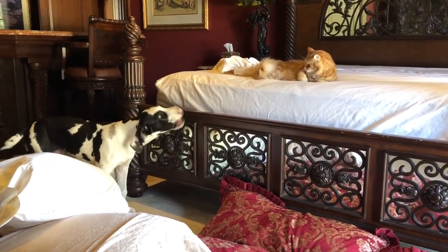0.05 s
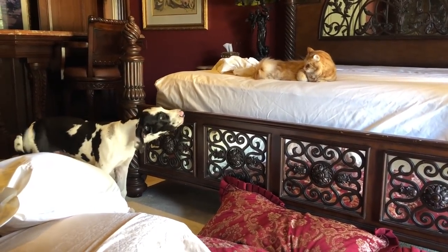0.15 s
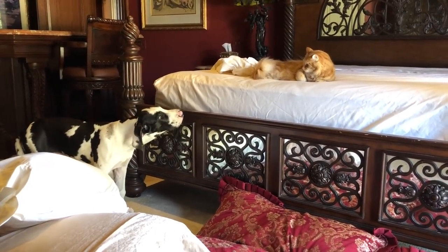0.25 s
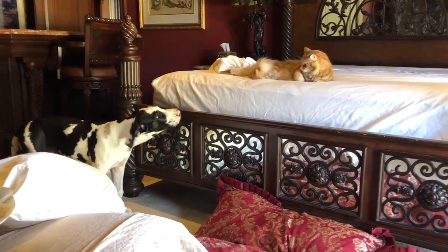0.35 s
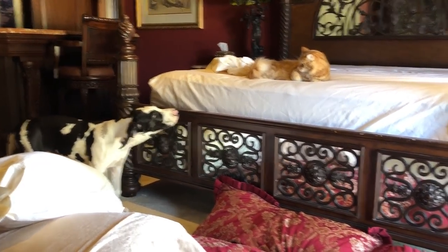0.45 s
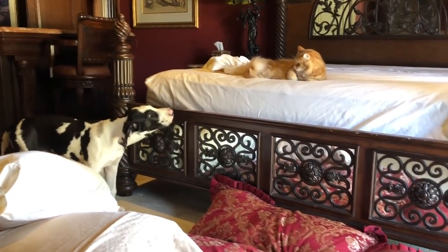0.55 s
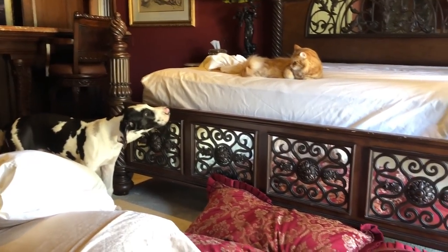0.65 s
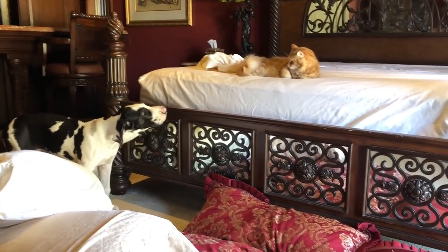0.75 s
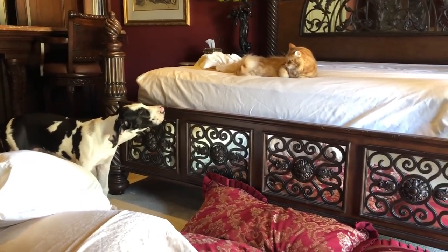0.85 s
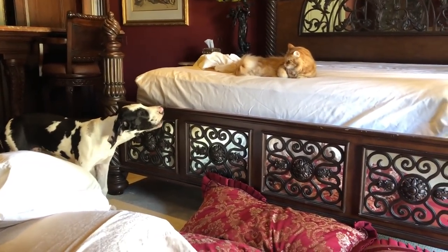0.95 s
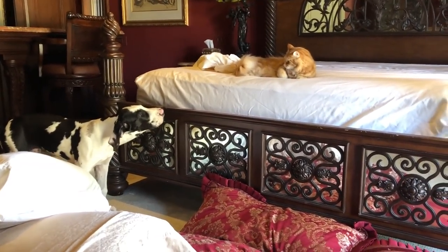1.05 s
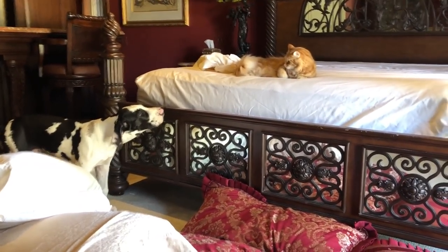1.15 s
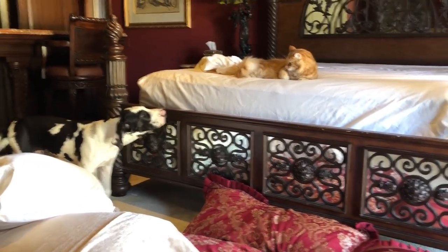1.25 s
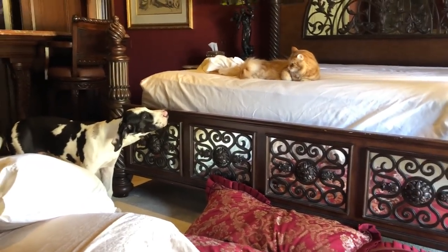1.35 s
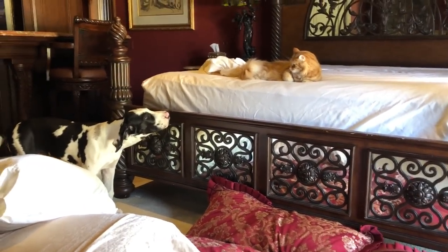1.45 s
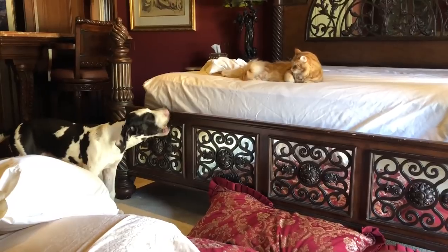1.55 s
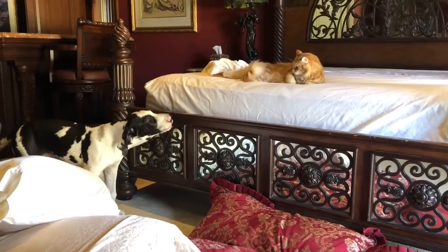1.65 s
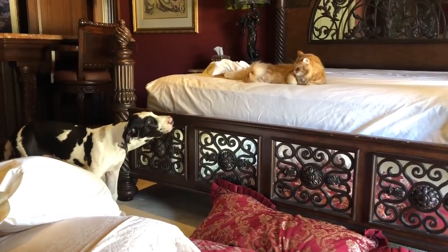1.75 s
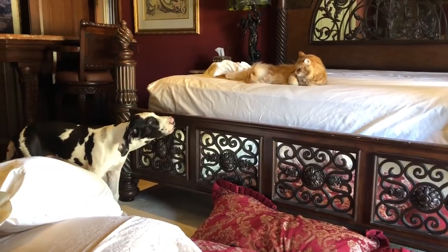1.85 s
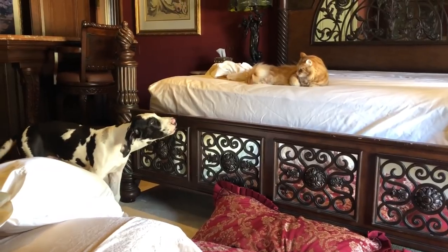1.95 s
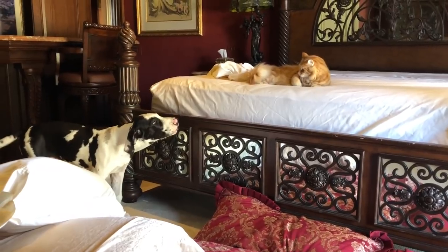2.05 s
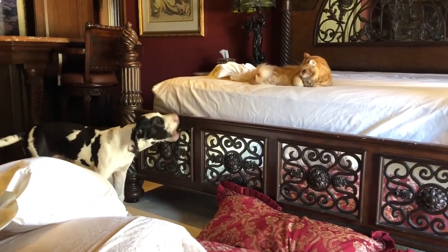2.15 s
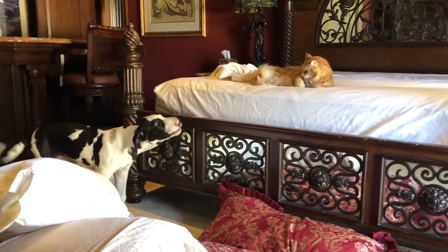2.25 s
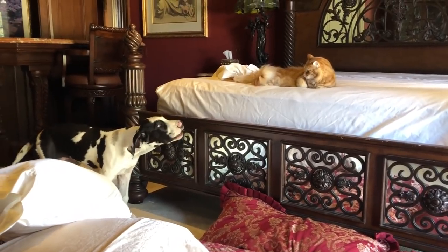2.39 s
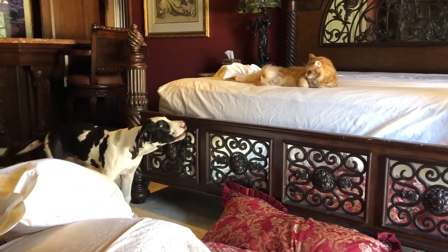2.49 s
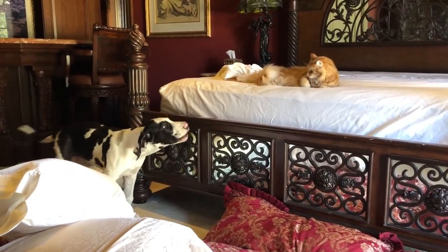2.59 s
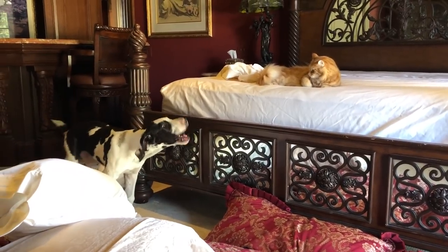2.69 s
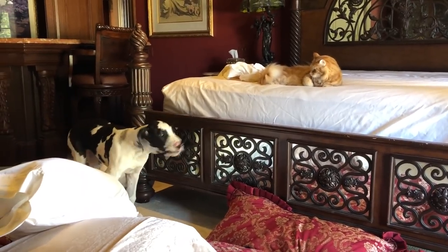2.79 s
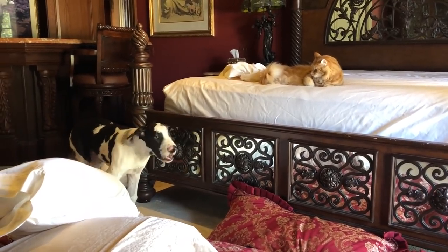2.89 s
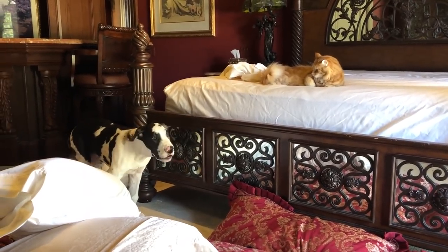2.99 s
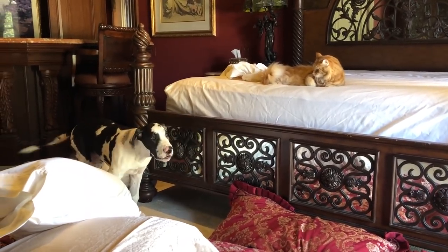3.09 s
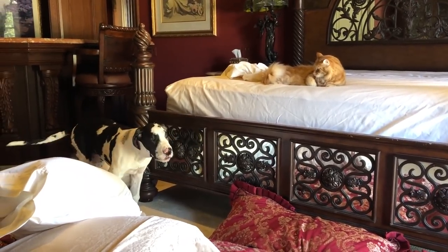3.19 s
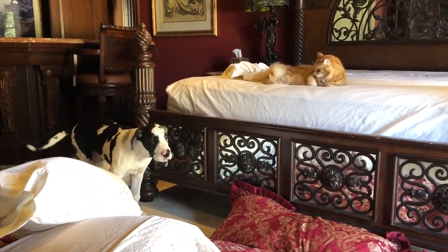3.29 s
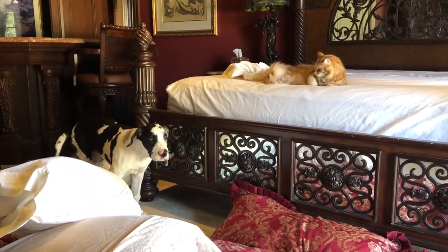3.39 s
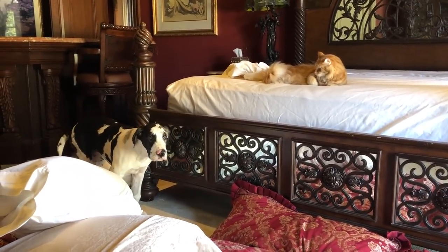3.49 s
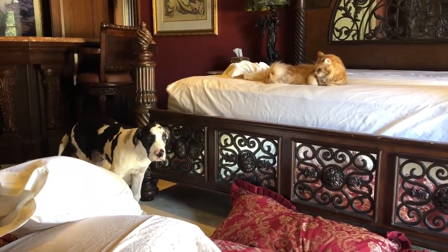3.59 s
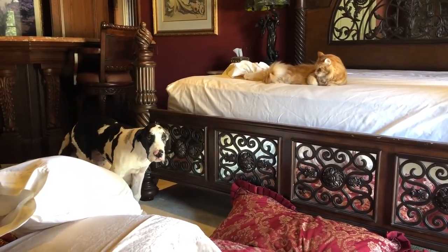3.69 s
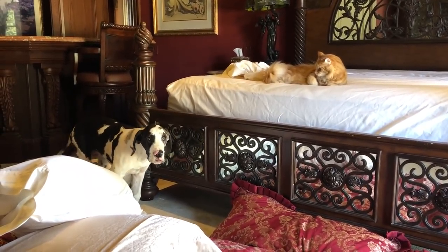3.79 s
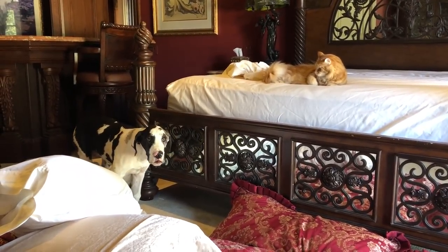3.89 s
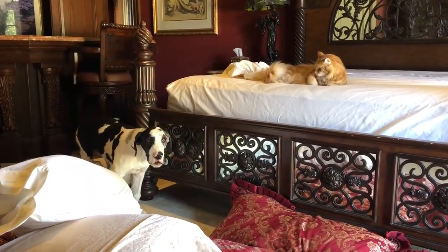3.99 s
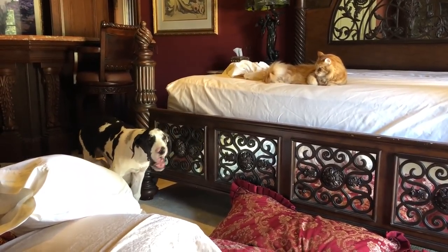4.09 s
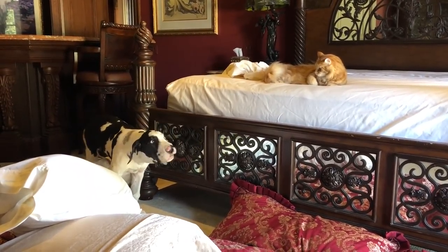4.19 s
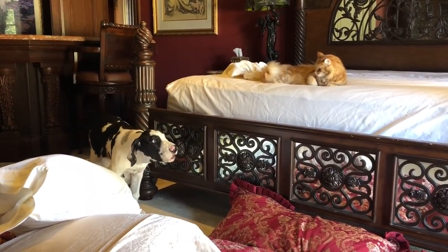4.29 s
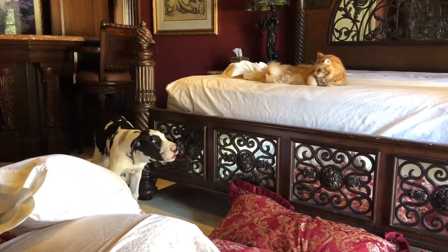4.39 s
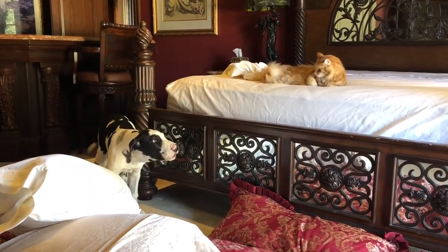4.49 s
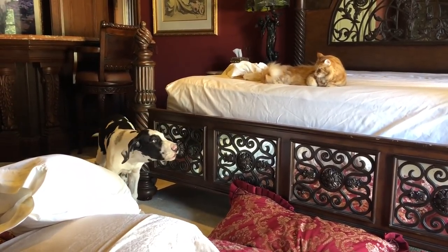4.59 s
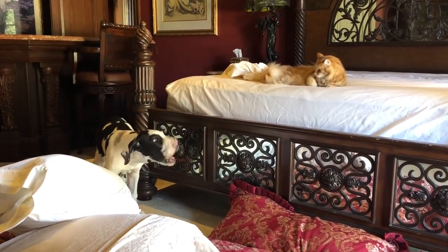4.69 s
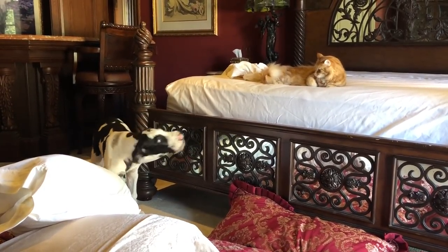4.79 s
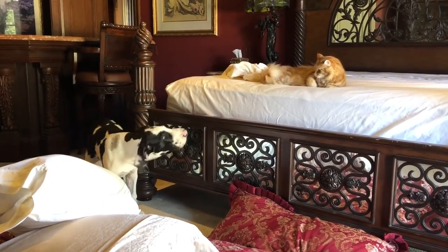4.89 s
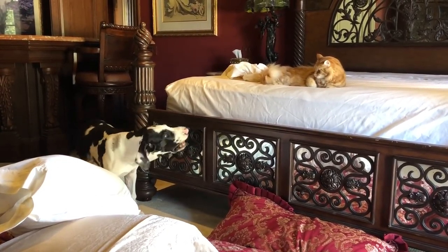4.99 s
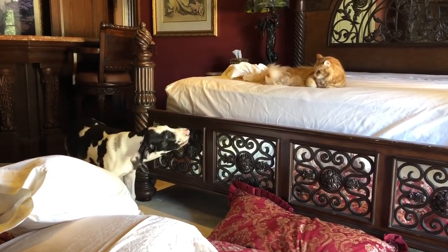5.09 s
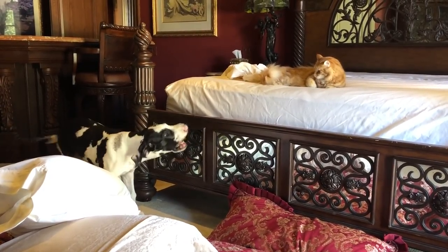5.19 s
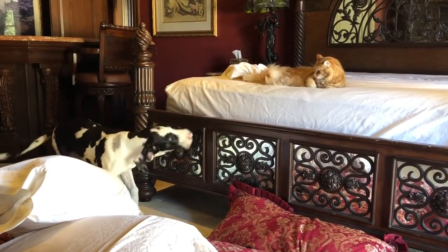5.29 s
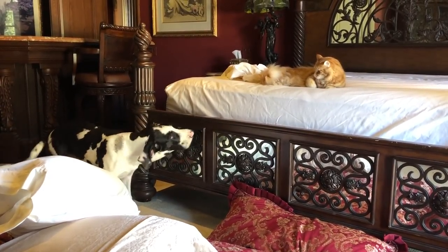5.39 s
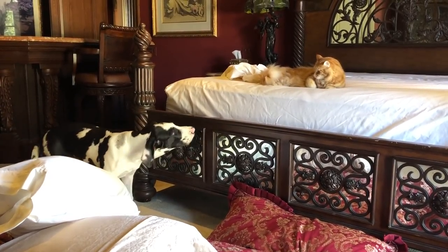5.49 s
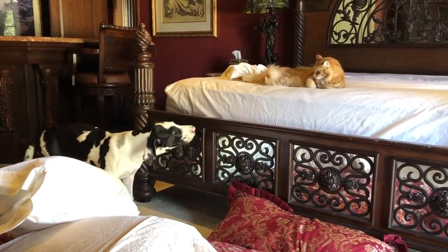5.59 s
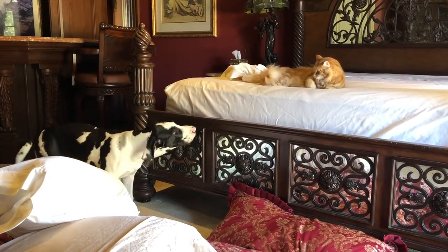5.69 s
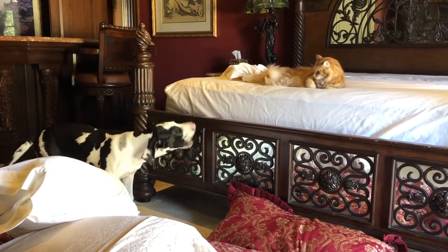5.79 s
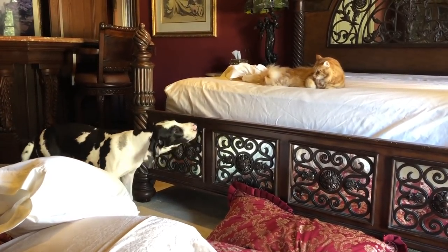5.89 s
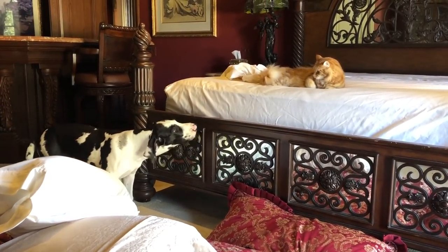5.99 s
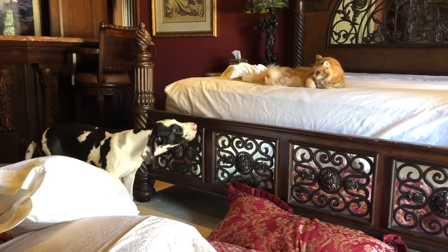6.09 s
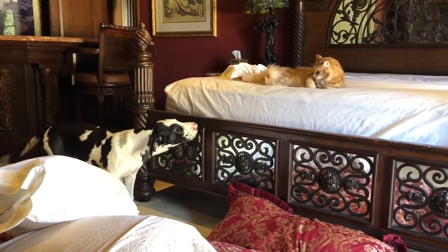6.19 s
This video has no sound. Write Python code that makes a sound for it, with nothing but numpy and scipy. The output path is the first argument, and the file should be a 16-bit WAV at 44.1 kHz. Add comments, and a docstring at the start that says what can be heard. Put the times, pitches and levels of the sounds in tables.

```python
"""Young dog barking in a bedroom

A young large dog barks at a cat on a bed, a few metres away in a reverberant bedroom.
Each bark starts as a clean high squeal, breaks into a rough lower growl and sags in pitch.
Between barks it yelps and whimpers, built from harmonics and raspy air like the barks, and
whines in a thin nasal whistle of four sine tones and hiss. Under it all lie a quiet hush and a
fading earlier bark. A microphone overload and a limiter flatten the peaks."""
import sys
import numpy as np
from scipy import signal
from scipy.fft import rfft, irfft, next_fast_len
from scipy.io import wavfile
from scipy.ndimage import uniform_filter1d, minimum_filter1d, map_coordinates

SR = 44100
rng = np.random.default_rng(int(sys.argv[2]) if len(sys.argv) > 2 else 0)


def master_out(mix):
    """Clip the mix to full scale and print it as 16-bit PCM to the path in sys.argv[1]."""
    frames = np.transpose(np.atleast_2d(mix))
    ceiling = np.clip(frames, -1, 1)
    pcm = np.round(ceiling * 32767).astype(np.int16)
    wavfile.write(sys.argv[1], SR, pcm)


N = 275625  # length in samples

# The barks. Each row: start in seconds, voice break in seconds, end in seconds, squeal's first pitch
# in Hz, squeal's last pitch in Hz, growl's top pitch in Hz, squeal level in dB, growl level in dB,
# growl roughness (0-1), mouth resonance in the squeal in Hz, mouth resonance in the growl in Hz,
# squeal's swell in dB, growl's fade in dB, share of the growl after which the jaw starts closing,
# slope of the squeal's overtones in dB per octave, pitch sag as a share of the top pitch.
BARK_CALLS = [ (0.047, 0.081, .178, 740, 790, 635.6, -9.5, -7, 0.44, 1595, 1270, 16, 5, .38, -3, .28),
              (1.602, 1.645, 1.742, 930, 1039, 716.4, -4.5, -5.5, .48, 1280, 1350, 14, 10, 0.49, -1.5, .37),
              (2.178, 2.231, 2.347, 667.4, 834.4, 659.8, -6, -6, 0.43, 2018, 1167, 29.5, 11, .42, -1.5, .16),
              (2.683, 2.720, 2.826, 705, 784.3, 630, -10.5, -7, 0.53, 1944, 1082, 14.5, 8.5, .28, -1.5, .15),
              (4.722, 4.778, 4.878, 775, 920, 699.8, -4.5, -3.5, 0.37, 2250, 1380, 24.5, 18, .62, -0.5, .28),
              (5.221, 5.266, 5.354, 574, 685.4, 657.4, -2, -6, .25, 1000, 1300, 22, 6.5, .8, -2.5, .27),
              (5.829, 5.872, 5.962, 754.5, 800.4, 639.8, -6.5, -7.5, .5, 1665, 1380, 21.5, 7.5, 0.48, -1, 0.27)]
# The yelps. Each row: start in seconds, loudest moment in seconds, start of the fall in seconds,
# end in seconds, first pitch in Hz, top pitch in Hz, held pitch in Hz, last pitch in Hz,
# peak level in dB, swell in dB, open mouth resonance in Hz, roughness after the crack (0-1).
YELP_CALLS = [(0.891, 1.023, 1.074, 1.126, 797.5, 938.8, 850.7, 610, -15.5, 27, 1680, .24),
              (4.061, 4.171, 4.190, 4.236, 880, 1019, 974.3, 520, -8, 16, 1869, .13)]
# The nasal whistles. Each row: start in seconds, end in seconds, first pitch in Hz, middle pitch
# in Hz, last pitch in Hz, level in dB, octave overtone in dB next to the main tone.
WHINE_CALLS = [ (0.617, .86, 3335, 3102, 3083, -58.5, 6.5), (0.849, 0.924, 3100, 3300, 3650, -51, -0.5),
               (1.285, 1.331, 3240, 3092, 2740, -41.5, -8.5), (2.166, 2.215, 3900, 3916, 4130, -51.5, -10),
               (3.283, 3.46, 3400, 3203, 3134, -60.5, -1), (3.483, 3.82, 3090, 3225, 3097, -63.5, -2),
               (4.035, 4.087, 3237, 3810, 4000, -39.5, -14.5), (4.299, 4.367, 2690, 2914, 3920, -38, -9.5),
               (4.702, 4.745, 3600, 3900, 4225, -42, -10)]
# The wavering whimper that trails the first yelp. Each row: time in seconds, pitch in Hz, level in dB.
WHIMPER_PATH = [(1.108, 660, -28), (1.170, 583, -32), (1.240, 623, -38), (1.319, 665, -36),
                (1.358, 598.5, -39.5)]
# The throat's fixed colour on the harmonics. Each row: frequency in Hz, relative level in dB.
THROAT_COLOUR = [(400, -9), (550, -2), (800, -5), (1150, 0), (1900, -2), (2500, -6), (3020, -14),
                 (3350, -29), (3850, -16), (5500, -25), (8000, -26), (11000, -37), (16000, -40)]
# The colour of the air that rasps through the throat. Each row: frequency in Hz, relative level in dB.
RASP_COLOUR = [(360, -42.5), (480, -15), (620, -4.5), (820, -18.5), (1200, 8), (1750, 9.5), (2450, -20.5),
               (2850, -22.5), (3300, -10), (3900, -15), (5500, -19.5), (8000, -28), (11500, -38),
               (16000, -32.5)]
# How long the room rings. Each row: frequency in Hz, time to die away by 60 dB in seconds.
ROOM_RING = [(200, 0.17), (600, 0.55), (1200, 0.6), (2500, 0.57), (5500, 0.48), (8500, .42), (11000, 0.35),
             (16000, 0.22)]
# The colour of the room's ringing. Each row: frequency in Hz, relative level in dB.
ROOM_TINT = [(300, 4.5), (600, -6.5), (850, 4), (1200, -1), (2500, -3), (6000, 3), (14000, -1.5)]
# The colour of the still room's hush. Each row: frequency in Hz, relative level in dB.
HUSH_COLOUR = [(25, -17), (64, -6), (146, -9), (300, -14.5), (600, -14.5), (1600, -19.5), (4000, -27.5),
               (8000, -34.5), (15000, -45.5)]
# The colour of the earlier bark's ringing. Each row: frequency in Hz, relative level in dB.
EARLIER_BARK_COLOUR = [(300, -23.5), (520, -14), (800, -18.5), (1100, 3), (2200, -28.5), (5000, -53.5)]
# The colour of the whistles' nostril hiss. Each row: frequency in Hz, relative level in dB.
NOSTRIL_COLOUR = [(1500, -35.0), (3000, 1.5), (4800, 8.5), (7500, -2.0), (12000, -2.0), (15000, -25.5)]

TOP_HZ = 15750  # nothing is kept above this
ATTACK_S, RELEASE_S = 0.0046, 0.011  # soft start and stop of a call (yelps start more slowly)

# Squeal: nearly clean, and it swells fastest at first
SQUEAL_ROUGH, SWELL_BEND = .13, 1.18
# Growl pitch: where it crests (share of length), how much lower it is at the break (share), sag curve
CREST_AT, SCOOP, SAG_BEND = .3, .13, 1.25  # a bend above 1 sags ever faster
# Growl roughness from start to end, times the bark's own roughness
ROUGH_FROM, ROUGH_TO = .6, 1.415
# Voice break: overlap of squeal and growl, the growl's extra burst and how fast the burst decays
OVERLAP_S, BREAK_DB, BREAK_FADE_S = .012, 5, 0.0076
SPENT_BEND = 2.3  # the growl fades ever faster as the air runs out
# The jaw closes over this share of the growl, down to this resonance
CLOSE_OVER, CLOSED_HZ = 0.41, 717
# Strength of the growl's mouth resonance at the break, and what it loses by the end
MOUTH_PEAK_DB, MOUTH_SLACK_DB = 22.5, 6.5

# Yelp: slow nearly clean start, mouth resonance at its start and its end
YELP_ATTACK_S, YELP_ROUGH, YELP_MOUTH_HZ, YELP_CLOSED_HZ = 0.03, .045, 1350, 648
CRACK_S = .005  # time the pitch takes to crack
# Level lost after the peak, and where the pitch tops (share of the rise)
YELP_FADE_DB, YELP_CREST_AT = 17.5, .72
# The jaw closes between these shares of the time after the peak
YELP_CLOSE_FROM, YELP_CLOSE_TO = .33, .6
# A last push of air during the fall (place and width as shares of the fall)
YELP_PUSH_DB, YELP_PUSH_AT, YELP_PUSH_WIDTH = 5, 0.7, .2
MUFFLE_DB = 4.5  # per octave: the closing mouth dulls the overtones

WHIMPER_ROUGH, WHIMPER_MOUTH_HZ = .07, 850
WHINE_EDGE_DB = 7.5  # each whistle is this much softer at its ends
QUIET_DB = -62.5  # level of the hush


def amp(db):
    """Turn decibels into gain."""
    return 10 ** (np.asarray(db) / 20)


def unit(x):
    """Scale to an average (rms) level of 1."""
    return x / np.sqrt(np.mean(x ** 2) + 1e-20)


def along(points, hz):
    """Read a value between (Hz, value) points on a log frequency axis."""
    f, v = np.transpose(points)
    return np.interp(np.log(hz + 1), np.log(f + 1), v)


def filtered(x, response):
    """Multiply the spectrum of x by a function of frequency."""
    m = next_fast_len(len(x) + 8192)
    spectrum = rfft(x, m) * response(np.fft.rfftfreq(m, 1 / SR))
    return irfft(spectrum, m)[:len(x)]


def noise(colour, size):
    """Make coloured noise with an rms of 1."""
    white = rng.standard_normal(size)
    return unit(filtered(white, lambda hz: amp(along(colour, hz))))


def wobble(rate, size):
    """Draw a smooth random curve through this many random points a second."""
    knots = rng.standard_normal(size)
    return map_coordinates(knots, [np.arange(size) * rate / SR], mode="wrap")


def add(track, start, sound):
    """Mix a sound into the track, cutting what runs past its end."""
    track[start:start + len(sound)] += sound[:len(track) - start]


def ramp(t, begin, end):
    """Rise in a straight line from 0 to 1 between two moments."""
    return np.clip((t - begin) / max(end - begin, 1e-4), 0, 1)


def span(start_s, end_s, attack_s):
    """Give the sample times of a call and its soft on-off gate."""
    t = np.arange(round(start_s * SR), round(end_s * SR)) / SR
    fade_in = ramp(t, start_s, start_s + attack_s)
    fade_out = np.sin(np.pi / 2 * (1 - ramp(t, end_s - RELEASE_S, end_s))) ** 2
    return t, fade_in * fade_out


def still_room_hush():
    """A faint steady noise, strongest in the bass, fills the still room."""
    return amp(QUIET_DB) * noise(HUSH_COLOUR, N)


def earlier_bark(db=-44, t60=0.78):
    """The room still rings faintly with a bark from just before: fading coloured noise."""
    decay = amp(db - 60 * np.arange(N) / SR / t60)
    return decay * noise(EARLIER_BARK_COLOUR, N)


def nearby_wood(x, echo_db=-19, spread=.012, count=6):
    """Floor, bed frame and desk return quick weak copies that weight the harmonics unevenly."""
    out = x.copy()
    for late, sign in rng.uniform(-1, 1, (count, 2)):
        delay_s = .001 + spread * abs(late)
        add(out, round(delay_s * SR), np.sign(sign) * amp(echo_db) * x)
    return out / np.sqrt(1 + count * amp(echo_db) ** 2)


def bedroom(x, build=0.013, wet_db=-5.0):
    """Reflections build up between the walls and die away; bedding swallows much of the treble."""
    hz, t, z = signal.stft(rng.standard_normal(SR), SR, nperseg=256)
    decay_db = along(ROOM_TINT, hz)[:, None] - 60 * t / along(ROOM_RING, hz)[:, None]
    tail = signal.istft(z * amp(decay_db), SR, nperseg=256)[1]
    tail *= 1 - np.exp(-(np.arange(len(tail)) / SR / build) ** 2)
    # scale the tail by its gain in the range of the voice, 500 to 2500 Hz
    response = np.abs(rfft(tail, SR))[500:2500]
    tail_gain = np.sqrt(np.mean(response ** 2))
    reflections = signal.fftconvolve(x, tail)[:len(x)]
    return x + amp(wet_db) * reflections / tail_gain


def in_room(track, start_s, sound):
    """Each call gets its own randomly drawn room reflections."""
    out = track.copy()
    padded = np.pad(sound, (0, SR))  # one second for the room to ring
    add(out, round(start_s * SR), bedroom(nearby_wood(padded)))
    return out


def whines(third_db=-23, fourth_db=-19, waver=0.0047, hiss_db=-27, hiss_growth=0.66):
    """A thin whistle through the nose, with overtones and hiss; each bends, swells and fades."""
    track = np.zeros(N)
    for start_s, end_s, first_hz, middle_hz, last_hz, peak_db, octave_db in WHINE_CALLS:
        t, gate = span(start_s, end_s, ATTACK_S)
        size = len(gate)
        place = np.linspace(-1, 1, size)  # -1 at the start, 0 in the middle, 1 at the end
        slope = (last_hz - first_hz) / 2
        curve = (first_hz + last_hz) / 2 - middle_hz
        pitch = middle_hz + slope * place + curve * place ** 2
        db = peak_db - WHINE_EDGE_DB * place ** 2
        phase = 2 * np.pi * np.cumsum(pitch * (1 + waver * wobble(210, size))) / SR
        partials = enumerate([0, octave_db, third_db, fourth_db], 1)
        tone = np.sqrt(2) * sum(amp(level) * np.sin(k * phase) for k, level in partials)
        # the hiss of the narrow nostril swells less than the tone
        hiss = amp(hiss_db + hiss_growth * db) * noise(NOSTRIL_COLOUR, size)
        track = in_room(track, start_s, gate * (amp(db) * tone + hiss))
    return track


def voice(pitch, db, rough, mouth_hz, mouth_db, mouth_width_hz, jitter, shimmer, doubling, rasp_db,
          bright_db, flutter=0.0054, lurch=.05, effort=0.12, harsh_db=4, leak=0.005,
          wander_db=2.06, air_flutter_db=3):
    """Vocal folds sound through throat and mouth; rough folds cycle unevenly and let air rasp."""
    size = len(pitch)
    rough = np.clip(rough, 0, 1)
    # the pitch always trembles a little; rough folds also lurch and slip from cycle to cycle
    pitch = pitch * (1 + (flutter + lurch * rough) * wobble(110.2, size))
    phase = 2 * np.pi * np.cumsum(pitch * (1 + jitter * rough * wobble(450, size))) / SR
    order = np.arange(1, 27)[:, None]  # 26 harmonics
    hz = order * pitch
    mouth = mouth_db / (1 + ((hz - mouth_hz) / mouth_width_hz) ** 2)
    # harder effort snaps the folds shut faster, and rough ones slap harder: more overtones
    slope_db = bright_db + effort * (db - db.max()) + harsh_db * rough
    gains = amp(along(THROAT_COLOUR, hz) + mouth + slope_db * np.log2(order)) * (hz < TOP_HZ)
    # each overtone's level drifts at random, more in the higher ones
    wander = np.array([wobble(45.3, size) for _ in order])
    gains = gains * amp(wander_db * np.log2(order) * wander)
    tone = np.sum(gains * np.sin(order * phase), 0) / np.sqrt(np.sum(gains ** 2, 0) / 2)
    # strong and weak cycles in turn fill the gaps between the harmonics
    tone *= 1 + rough * doubling * np.sin(phase / 2)
    # air escapes in one puff per cycle
    puffs = noise(RASP_COLOUR, size) * (1 + np.cos(phase))
    # the level of the rasp noise flutters at random
    air_flutter = amp(air_flutter_db * wobble(55, size))
    air = amp(rasp_db) * (rough + leak) * unit(puffs * air_flutter)
    # uneven bursts of cycles carry tone and air alike
    bursts = unit(amp(shimmer * rough * np.tanh(wobble(263.1, size))))
    return amp(db) * bursts * (tone + air)


def soft_voice(pitch, db, rough, mouth_hz, closed, open_bright_db=-0.84):
    """The clearer, less breathy voice of yelps and whimpers; a closing mouth dulls it."""
    return voice(pitch, db, rough, mouth_hz, mouth_db=12, mouth_width_hz=180, jitter=0.068,
                 shimmer=5, doubling=0.055, rasp_db=-14,
                 bright_db=open_bright_db - MUFFLE_DB * closed)


def whimper():
    """A low wavering tone through a partly closed mouth."""
    s, pitch_hz, level_db = np.transpose(WHIMPER_PATH)
    t, gate = span(s[0], s[-1], ATTACK_S)
    pitch, db = np.interp(t, s, pitch_hz), np.interp(t, s, level_db)
    return s[0], gate * soft_voice(pitch, db, WHIMPER_ROUGH, WHIMPER_MOUTH_HZ, closed=.1)


def yelp(start_s, peak_s, fall_s, end_s, first_hz, top_hz, held_hz, last_hz, peak_db, swell_db,
         open_hz, roughness):
    """Pitch arches as level and mouth resonance change; the voice cracks, holds, then falls away."""
    t, gate = span(start_s, end_s, YELP_ATTACK_S)
    rise, after, fall = ramp(t, start_s, peak_s), ramp(t, peak_s, end_s), ramp(t, fall_s, end_s)
    cracked = ramp(t, peak_s - CRACK_S / 2, peak_s + CRACK_S / 2)
    closed = ramp(after, YELP_CLOSE_FROM, YELP_CLOSE_TO)
    arch = top_hz - (top_hz - first_hz) * (1 - rise / YELP_CREST_AT) ** 2
    held = held_hz + (last_hz - held_hz) * fall
    pitch = arch + (held - arch) * cracked
    push = YELP_PUSH_DB * np.exp(-((fall - YELP_PUSH_AT) / YELP_PUSH_WIDTH) ** 2)
    db = peak_db - swell_db * (1 - rise) - YELP_FADE_DB * after + push
    rough = YELP_ROUGH + (roughness - YELP_ROUGH) * cracked
    opening_hz = YELP_MOUTH_HZ + (open_hz - YELP_MOUTH_HZ) * rise
    mouth_hz = opening_hz + (YELP_CLOSED_HZ - open_hz) * closed
    return start_s, gate * soft_voice(pitch, db, rough, mouth_hz, closed)


def bark(start_s, break_s, end_s, first_hz, last_hz, top_hz, squeal_db, growl_db, roughness,
         squeal_mouth_hz, growl_mouth_hz, swell_db, fade_db, close_at, squeal_bright_db, sag):
    """A rising squeal gives way to a rough growl that crests and sags while the jaw closes."""
    t, gate = span(start_s, end_s, ATTACK_S)
    rise, run = ramp(t, start_s, break_s), ramp(t, break_s, end_s)

    squeal_pitch = first_hz + (last_hz - first_hz) * rise
    squeal_level = squeal_db - swell_db * (1 - rise) ** SWELL_BEND
    squeal = voice(squeal_pitch, squeal_level, SQUEAL_ROUGH, squeal_mouth_hz, mouth_db=15,
                   mouth_width_hz=400, jitter=.08, shimmer=8, doubling=.15, rasp_db=-2,
                   bright_db=squeal_bright_db, wander_db=2.5)

    scoop = SCOOP * (1 - ramp(run, 0, CREST_AT))
    pitch = top_hz * (1 - scoop - sag * ramp(run, CREST_AT, 1) ** SAG_BEND)
    burst = BREAK_DB * np.exp(-np.abs(t - break_s) / BREAK_FADE_S)
    db = growl_db + burst - fade_db * run ** SPENT_BEND
    rough = roughness * (ROUGH_FROM + (ROUGH_TO - ROUGH_FROM) * run)
    closing = ramp(run, close_at, close_at + CLOSE_OVER)
    mouth_hz = growl_mouth_hz + (CLOSED_HZ - growl_mouth_hz) * closing
    growl = voice(pitch, db, rough, mouth_hz, mouth_db=MOUTH_PEAK_DB - MOUTH_SLACK_DB * run,
                  mouth_width_hz=410, jitter=.035, shimmer=13.6, doubling=.3, rasp_db=-3.5,
                  bright_db=-1.17)

    # crossfade from squeal to growl around the break
    broken = np.pi / 2 * ramp(t, break_s - OVERLAP_S / 2, break_s + OVERLAP_S / 2)
    return start_s, gate * (np.cos(broken) * squeal + np.sin(broken) * growl)


def barks_and_yelps(low_hz=450):
    """All voiced calls, placed in the room; the small mouth radiates almost no bass."""
    calls = [bark(*row) for row in BARK_CALLS] + [yelp(*row) for row in YELP_CALLS] + [whimper()]
    radiation = signal.butter(8, low_hz, "high", fs=SR, output="sos")
    track = np.zeros(N)
    for start_s, sound in calls:
        track = in_room(track, start_s, signal.sosfilt(radiation, sound))
    return track


def scene():
    """The dog in the room, over a faint hush and the ringing of an earlier bark."""
    background = still_room_hush() + earlier_bark()
    return (background + whines() + barks_and_yelps())[None]


def record(dry, hold=0.0017, overload=0.25, thump_db=-24, thump_hz=450):
    """The microphone overloads, a fast limiter holds the peaks down, then the top treble is cut."""
    x = dry[0]
    # loud crests are squeezed on one side, which leaves a soft low thump
    excess = np.maximum(x - overload, 0)
    thump = filtered(excess, lambda hz: hz / (hz + 45) / (1 + (hz / thump_hz) ** 2))
    x = x - amp(thump_db) * thump
    # the limiter turns down around each peak, with a smoothed gain
    size = max(int(hold * SR), 3)
    needed = np.minimum(1, .98 / (np.abs(x) + 1e-9))
    gain = uniform_filter1d(minimum_filter1d(needed, size), size)
    return filtered(x * gain, lambda hz: hz < TOP_HZ)[None]


dry = scene()
out = record(dry)
master_out(out)
```